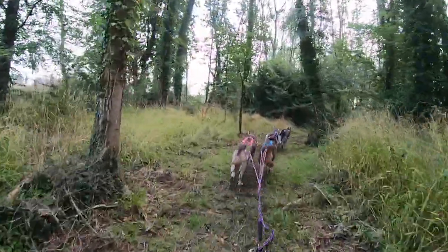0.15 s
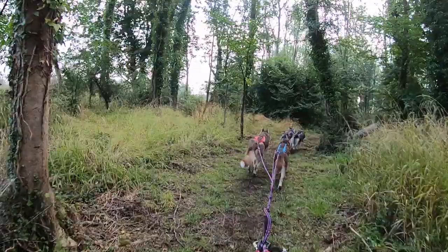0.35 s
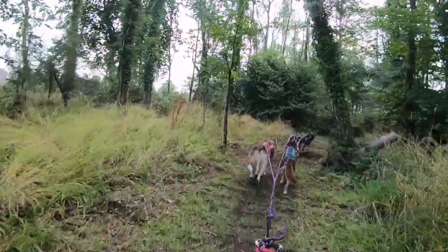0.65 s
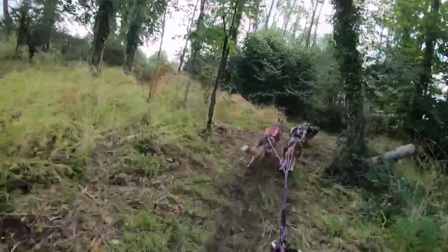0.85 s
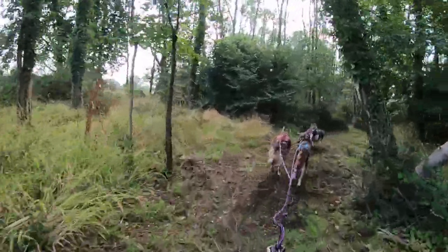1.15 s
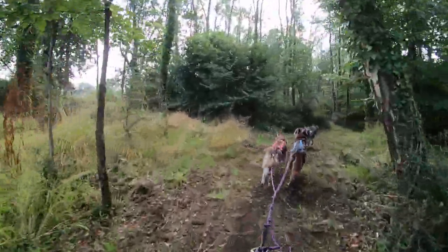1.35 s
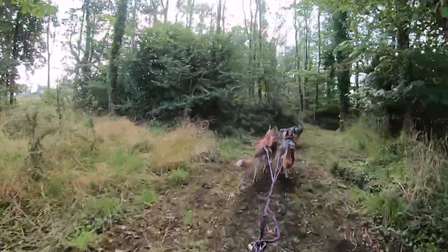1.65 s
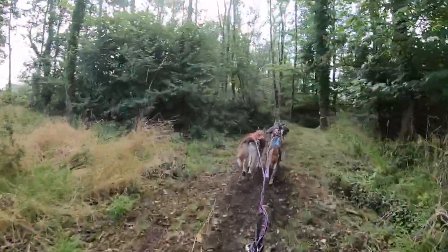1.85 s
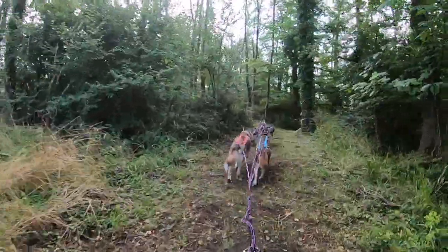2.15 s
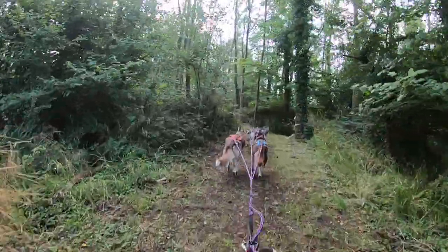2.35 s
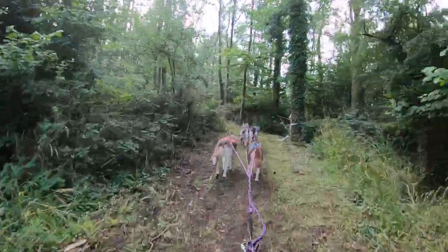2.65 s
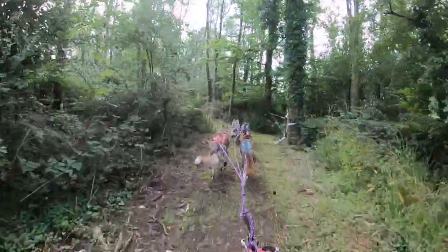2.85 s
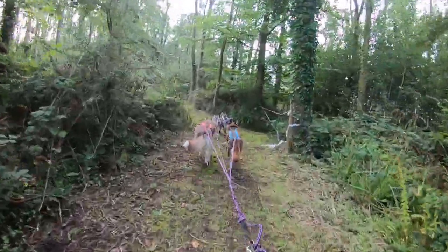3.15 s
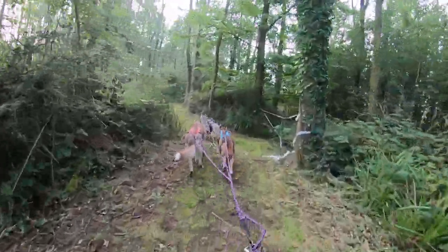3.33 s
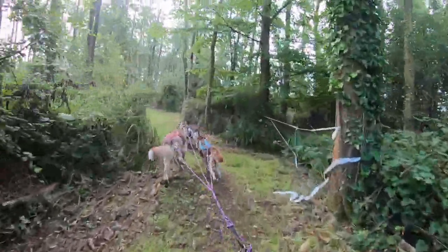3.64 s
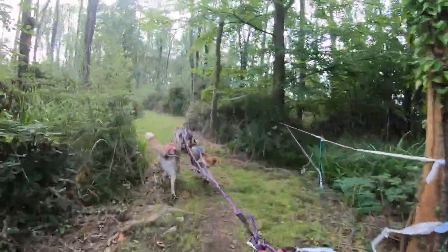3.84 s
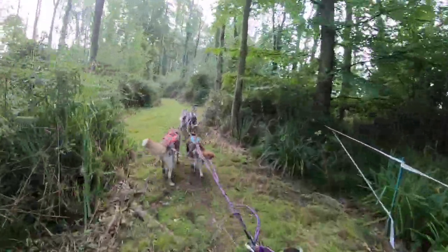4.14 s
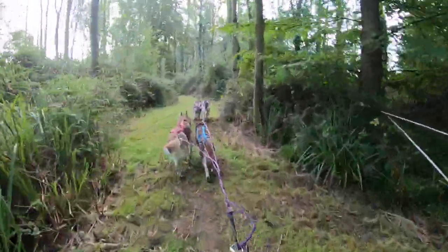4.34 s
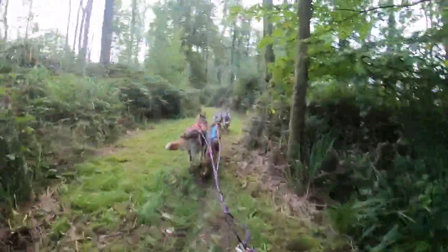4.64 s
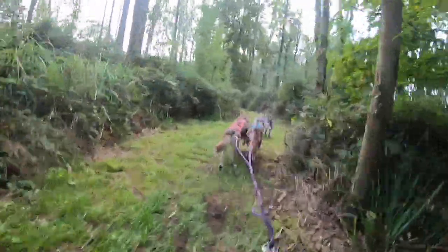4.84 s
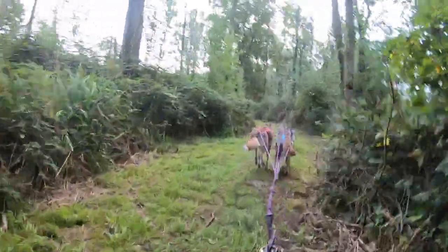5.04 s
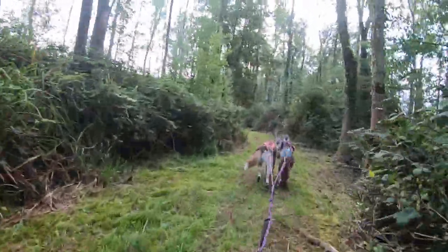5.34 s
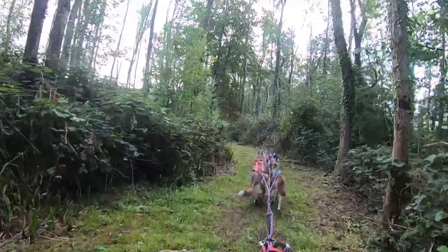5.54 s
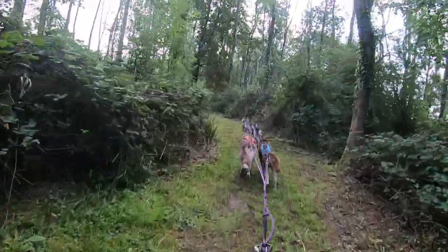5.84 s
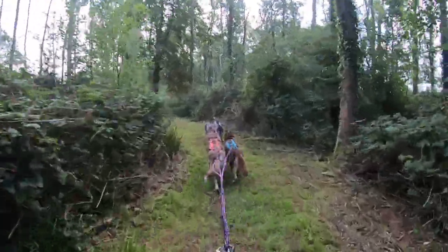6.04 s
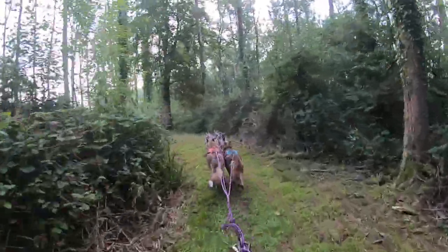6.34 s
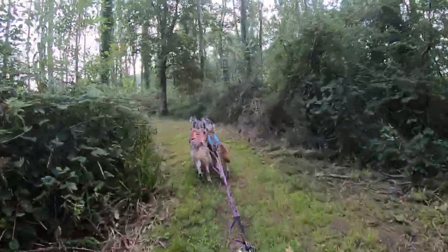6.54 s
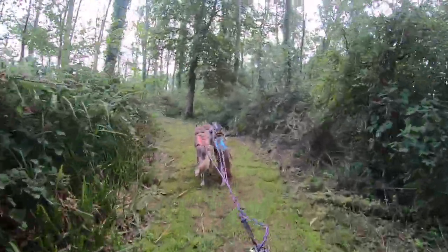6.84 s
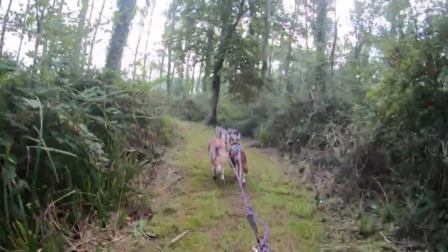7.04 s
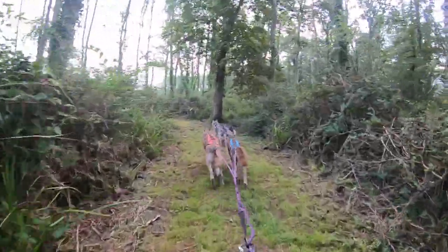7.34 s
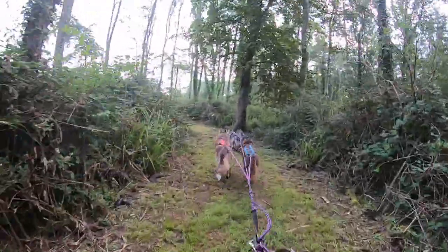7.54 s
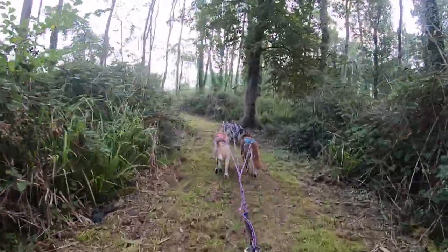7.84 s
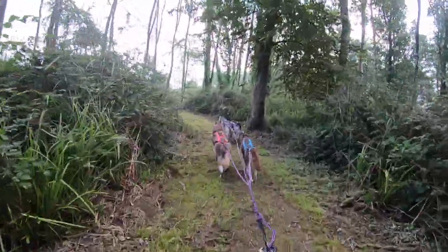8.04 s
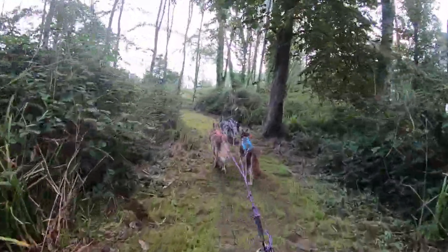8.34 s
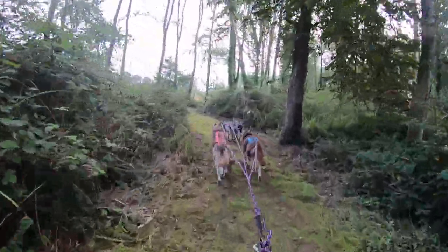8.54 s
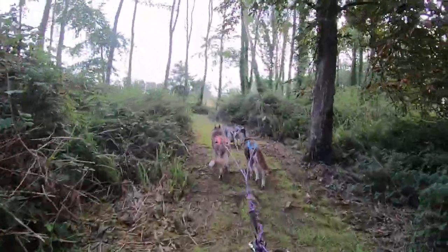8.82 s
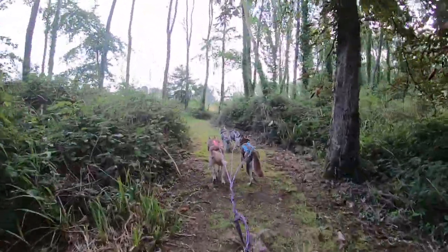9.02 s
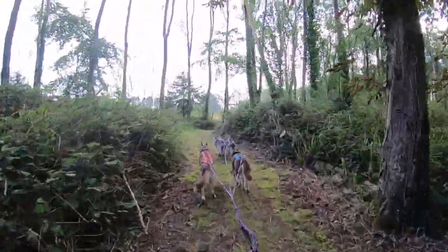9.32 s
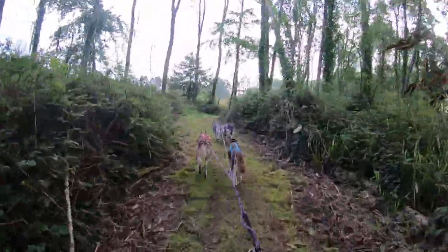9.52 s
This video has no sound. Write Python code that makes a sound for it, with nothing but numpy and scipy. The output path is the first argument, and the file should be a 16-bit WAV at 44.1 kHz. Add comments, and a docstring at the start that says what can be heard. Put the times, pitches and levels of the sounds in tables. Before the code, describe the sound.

A wheeled dog rig jolts along a dirt trail, with constant low wind rumble and frequent irregular clacks and rattles.

```python
"""Dog rig on a woodland trail

A ride on a wheeled rig behind a dog team, heard from a camera mounted on it. Wind and jolts rumble in
the microphone, tyres roll over earth and leaves, and bumps slap the loose mount against its stops.
Steel fittings clank, the frame knocks, line clips and dog tags tinkle, and something brushes a wheel."""
import sys
import numpy as np
from scipy import signal
from scipy.io import wavfile
from scipy.ndimage import uniform_filter1d

SR = 44100
rng = np.random.default_rng(int(sys.argv[2]) if len(sys.argv) > 2 else 0)


def to_wav(s):
    """Save 16-bit WAV."""
    ch = np.atleast_2d(s).T  # columns
    pcm = np.round(np.clip(ch, -1, 1) * 32767)  # PCM
    wavfile.write(sys.argv[1], SR, pcm.astype(np.int16))


N = 426888

# roots and ruts that shake the whole rig: t/s, length/s, rattle/dB, thump/dB, shudder/dB
BUMPS = [(0.03, 0.078, -35.5, -29, -34), (0.213, 0.014, -44, -14, -24), (0.311, 0.053, -25.5, -15, -21),
         (0.385, 0.029, -39, -7.5, -31), (0.759, 0.066, -47, -18.5, -28), (0.915, 0.04, -35, -16.5, -24),
         (.954, 0.023, -25.5, -14, -21), (0.999, 0.053, -21.5, -12, -18.5), (1.078, 0.011, -33, -24, -31),
         (1.214, 0.026, -62, -28, -29), (1.28, 0.045, -34.5, -16, -25.5), (1.331, 0.049, -30, -13.5, -22.5),
         (1.429, 0.014, -26, -11, -23), (1.502, 0.058, -52, -33, -50), (2.032, 0.031, -39, -20, -39),
         (2.274, 0.032, -41, -20, -40), (2.363, 0.057, -36, -15, -31.5), (2.948, 0.025, -38, -10.5, -32),
         (3.041, 0.044, -41, -13.5, -27), (3.425, 0.097, -68, -18, -32), (3.628, 0.046, -36, -17, -28),
         (3.678, 0.027, -25, -12.5, -22.5), (3.784, 0.057, -36.5, -14, -42), (3.869, 0.1, -36, -15, -30),
         (4.012, 0.051, -27.5, -17, -29.5), (4.142, 0.051, -31, -32, -45), (4.214, 0.022, -29, -27, -25),
         (4.364, 0.034, -21.5, -12, -22), (4.478, 0.1, -26, -15.5, -26.5), (4.625, 0.044, -31.5, -15, -34),
         (4.685, 0.069, -22.5, -17, -22.5), (4.799, 0.078, -23, -17, -21.5), (4.955, 0.048, -17, -20, -28),
         (5.03, 0.059, -18.5, -32, -30), (5.167, 0.089, -17, -12, -23.5), (5.271, 0.057, -27.5, -21, -36),
         (5.439, 0.078, -32.5, -23, -33), (5.758, 0.13, -36.5, -17.5, -30.5), (6.031, 0.055, -30, -17, -29),
         (6.136, 0.031, -33, -13.5, -23.5), (6.204, 0.076, -26.5, -15, -24.5), (6.36, 0.054, -55, -35, -47),
         (6.421, 0.047, -36, -35, -32), (6.558, 0.021, -28.5, -10.5, -25), (6.815, 0.043, -32, -22, -28.5),
         (6.887, 0.025, -58, -21, -25.5), (7.013, 0.083, -26.5, -14, -26.5),
         (7.107, 0.035, -16.5, -11, -18), (7.165, 0.053, -37, -12.5, -33), (7.239, 0.039, -27, -11, -25.5),
         (7.32, 0.013, -54, -18, -35), (7.537, 0.016, -36, -13, -26), (7.684, 0.088, -35, -12, -28),
         (7.992, 0.02, -44, -14.5, -29), (8.042, 0.05, -55, -31, -42), (8.143, 0.03, -25, -11, -20.5),
         (8.399, 0.013, -55, -25, -52), (8.54, 0.094, -45.5, -16.5, -45), (8.704, 0.039, -15, -11, -21),
         (8.753, 0.019, -49, -28, -37), (8.822, 0.055, -23, -13, -24.5), (9.054, 0.062, -26, -11.5, -27),
         (9.324, 0.027, -57, -19, -44), (9.443, 0.024, -24.5, -25, -23), (9.496, 0.072, -50, -21, -31),
         (9.673, .03, -16, -21, -41)]
# accent slaps of the mount against its stops: t/s, level/dB, hollow body offset/dB
HARD_SLAPS = [(0.0097, -21.5, -8), (0.0353, -29, 2), (0.068, -21, -1), (0.0767, -23, -2), (0.086, -21, -5),
              (0.0987, -19, -8), (0.3281, -16.5, -3.5), (0.3378, -18, -12), (0.353, -17.5, -4),
              (0.5717, -33, -12), (0.788, -24.5, -4), (0.888, -34.5, 1), (0.964, -16, 1.5),
              (0.9992, -8, -13), (1.0195, -7.5, -6), (1.0308, -8.5, -9), (1.077, -18, -2.5),
              (1.332, -17.5, -1.5), (1.369, -15.5, -10), (2.3, -18.5, -4.5), (2.3805, -12.5, -15),
              (3.669, -23.5, 3), (3.676, -21, 2), (3.6823, -21.5, -4), (3.697, -17, -4), (3.7071, -27, -5),
              (3.8042, -25, -10), (3.8224, -29.5, 3), (3.8855, -16.5, -5), (3.8925, -20.5, -10),
              (3.9225, -28, 7.5), (4.0141, -12, -15), (4.023, -17.5, -6), (4.0367, -15.0, -4),
              (4.1438, -27, 7.5), (4.2192, -17.5, -3), (4.3761, -11, -15), (4.384, -11, -7),
              (4.474, -16, -10), (4.4819, -18, -3.5), (4.4897, -17, -2), (4.5013, -16, -2),
              (4.5166, -15, -7), (4.5669, -15.5, -1), (4.5798, -19.5, -1), (4.6257, -15.5, -8),
              (4.6861, -15, -8), (4.705, -12, -4.5), (4.7177, -13.5, -12), (4.7289, -16, -7),
              (4.7545, -8, -7), (4.7848, -18, -1), (4.8106, -9, -9), (4.8226, -7, -7), (4.838, -8, -7),
              (4.8458, -11.5, -3), (4.8538, -18.5, 2), (4.878, -11, -14), (4.917, -17, -13),
              (4.9575, -10.5, -2), (4.9694, -10, -3), (4.9769, -15.5, 3), (4.9867, -19, -9),
              (4.9987, -7.5, -7), (5.025, -19.5, -3), (5.0347, -11.5, -2), (5.064, -9.5, -6),
              (5.0775, -13.5, -1), (5.0903, -13, -1), (5.1166, -17.5, -9), (5.1646, -10, -5),
              (5.178, -6.5, -7), (5.1898, -12.5, -2), (5.2027, -14, -1), (5.2114, -16, -13),
              (5.2188, -12, -4), (5.233, -4.5, -14), (5.2465, -12.5, -5), (5.2557, -14, -8),
              (5.2712, -12.5, -9), (5.2851, -15.5, -3), (5.3211, -13, -10), (5.3297, -17.5, -5),
              (5.3673, -24, -11), (5.394, -27, -16), (5.44, -29, -2), (5.4953, -16.5, -10),
              (5.7726, -20.5, -1), (5.7867, -22, -2), (5.8112, -23, -2), (5.8346, -22.5, -5),
              (5.8777, -18, -4.5), (6.0319, -20, -5), (6.0762, -20, -14), (6.1241, -22, -14),
              (6.1372, -13.5, -7.5), (6.1503, -17.5, -4), (6.1584, -16, -15), (6.1805, -17, -10),
              (6.2046, -8.5, -10), (6.212, -18, -7), (6.227, -10, -15), (6.2315, -15, -8),
              (6.2367, -20, -7), (6.248, -11, -17), (6.2547, -18, -14), (6.2664, -13.5, -13),
              (6.2754, -15, -19), (6.4217, -24, -8), (6.5557, -15, -3), (6.5725, -21, -2),
              (6.7287, -20.5, -12), (6.7525, -22, -12), (6.8234, -23, -5), (6.839, -24.5, 1),
              (6.903, -33, -10), (7.0203, -13.5, -7), (7.0447, -14.5, -6), (7.0613, -16.5, -3.5),
              (7.0731, -16, -2), (7.0797, -14, -7), (7.1067, -8.5, -3), (7.117, -7, -6), (7.1298, -14, 3),
              (7.1422, -7, -0.5), (7.1784, -18, -9), (7.2197, -17.5, 0.5), (7.2648, -14.5, -2),
              (7.2735, -16.5, -2), (7.3216, -22.5, -11), (7.554, -21, -3), (7.7255, -16.5, -9.5),
              (7.7362, -23, -11), (7.7567, -20, -6), (7.9911, -23.5, -10), (8.149, -15.5, -9),
              (8.1581, -12, -9), (8.1655, -17, -9), (8.1757, -13, -13), (8.3993, -24, -13),
              (8.5424, -25, -2), (8.708, -11.5, 0), (8.7199, -13.5, -2.5), (8.728, -15.5, 1.5),
              (8.7414, -12.5, -11), (8.8645, -9.5, -12.5), (8.8749, -15, -0.5), (8.8867, -18, -8),
              (9.0191, -23.5, -7), (9.0589, -10, -10), (9.0693, -14, -5), (9.0952, -18, -5),
              (9.119, -18.5, -9), (9.451, -22, 2), (9.463, -16, -3), (9.5247, -27, -19), (9.61, -25.5, -17),
              (9.6728, -14, -3)]
# modes of the mount's hollow body: f/Hz, width/Hz, level/dB
BODY_MODES = [(161, 62, -9), (267, 118, 3.5), (434, 350, -2.5), (868, 380, 2), (1116, 77, 7),
              (1240, 100, 4), (1457, 570, -0.5), (1793, 290, -1.5)]
# modes of the mount's stiff shell: f/Hz, width/Hz, level/dB
SHELL_MODES = [(1160, 910, -3.5), (2060, 1620, -3), (2606, 310, 1), (3122, 366, -2), (3317, 230, 4),
               (3582, 203, -0.5), (4210, 656, -5), (4745, 910, -7.5), (5850, 2300, -7.5),
               (6400, 2450, -12.5), (9000, 490, -26), (10400, 470, -31.5)]


def rumble(wind_db, thump):
    """The low end: wind buffets the microphone port and the heavy frame booms on every bump."""
    # spectra of the wind and of the frame's boom: f/Hz, level/dB
    wind_spectrum = [(18, -3), (30, -4), (50, 4.5), (65, 2), (85, 2.5), (120, -4.5), (160, -24.5),
                     (300, -54), (600, -81)]
    boom_spectrum = [(20, -12), (32, -1), (50, 3.5), (65, -2), (85, 5), (120, -3.5), (160, -21), (300, -42)]
    # brief dips in the rumble, swells where negative: middle t/s, length/s, depth/dB
    rumble_dips = [(.14, 0.043, 8), (.5, 0.28, 8), (.75, 0.021, 10), (1.2, 0.1, 8), (1.82, 0.061, 3),
                   (2.0, 0.027, 8), (2.6, 0.14, 7), (2.91, 0.04, 10), (3.38, 0.045, -2.5),
                   (3.6, 0.044, -3.5), (3.72, 0.037, -6), (3.755, 0.042, 9), (4.0, 0.028, 8),
                   (4.05, 0.044, -3), (4.15, 0.05, 5), (4.34, 0.047, 6), (4.55, 0.042, 3.5),
                   (5.6, 0.076, 12), (5.705, .035, 10), (5.973, 0.054, 10), (6.5, 0.038, -1),
                   (6.66, 0.049, 8), (6.94, 0.071, 4), (7.3, 0.03, 10), (7.46, 0.045, 9), (7.58, 0.028, 10),
                   (7.67, 0.024, 15), (7.93, 0.039, 7), (8.26, 0.077, 7), (8.5, 0.024, 1),
                   (9.2, 0.081, 4.5), (9.4, 0.047, 1)]
    gusting = from_db(wind_db + 2.5 + 1.64 * drift(25))
    gusts = gusting * steady(coloured(wind_spectrum, patchy_db=1), span_s=.07)
    boom = from_db(-3.5) * thump * steady(coloured(boom_spectrum, patchy_db=1.5), span_s=.027)
    return from_db(dips_db(rumble_dips)) * (gusts + boom)


def mount(times, level_db, body_db):
    """The mount slaps: its hollow body flexes first, then the shell hits the stop with a dry snap."""
    shell = strike(times, level_db, SHELL_MODES, rise_s=.0009, contact_s=.0011,
                   scatter_db=1, buzz_db=-22, buzz_s=.007, snap=.7)
    body = strike(times - .0015, level_db + body_db, BODY_MODES, rise_s=.0025, contact_s=.0016,
                  scatter_db=1.5, buzz_db=-13, buzz_s=.011, snap=.6)
    return shell + from_db(5.5) * body


def clacks():
    """Roots and ruts throw the mount hard against its stops."""
    return from_db(25) * mount(*np.transpose(HARD_SLAPS))


def rattles(swings_per_s=92, jitter=.22, decay_db_per_s=656, ceiling_db=-23, tail_s=.04):
    """Each bump sets off a run of slaps, one per swing of the mount, dying fast once it is crossed."""
    chance = np.clip(rng.standard_normal((len(BUMPS), 2, 30)), -2, 2)
    hard_times = np.array(HARD_SLAPS)[:, 0]
    slaps = []
    for (start, length, rattle_db, *_), (timing, size) in zip(BUMPS, chance):
        gaps = np.exp(jitter * timing) / swings_per_s
        t = np.cumsum(gaps) - gaps[0]
        fade_db = decay_db_per_s * np.maximum(t - length, 0)
        level_db = np.minimum(rattle_db + 2 + 2.5 * size - fade_db, ceiling_db)
        # a swing that ends in a hard slap makes no second one
        free = np.abs(start + t[:, None] - hard_times).min(axis=1) > .65 / swings_per_s
        heard = free & (t < length + tail_s) & (start + t < N / SR)
        slaps += zip(start + t[heard], level_db[heard])
    return from_db(27) * mount(*np.transpose(slaps), body_db=-2.5)


def frame_shudder(shudder_db, shake):
    """The running frame shudders in the low mids, harder on bumps."""
    # spectrum of the shaking frame: f/Hz, level/dB
    spectrum = [(100, -8.5), (170, 1.5), (250, -2), (350, -5.5), (480, -12), (700, -18), (1200, -25.5)]
    level = np.hypot(from_db(shudder_db + .5), from_db(-5) * shake)
    return level * steady(coloured(spectrum, patchy_db=5.5), span_s=.055)


def tyres(roll_db, shake):
    """Tyres roll on soft earth with a dull, lumpy noise, and the wheels hum along."""
    # modes of the rolling wheels: f/Hz, width/Hz, level/dB
    wheel_modes = [(508, 57, 3), (1140, 146, -4.5), (1485, 146, -6), (1840, 130, -9.5)]
    # spectrum of tyres on earth: f/Hz, level/dB
    spectrum = [(150, -4), (330, 6.5), (520, 2.5), (700, -3), (900, -5.5), (1120, -16), (1400, -17.5),
                (1900, -24), (2600, -28)]
    tread = rng.standard_normal(N) * from_db(4.6 * drift(30))
    hum = rms_one(sum(from_db(db) * resonate(tread, hz, width_hz) for hz, width_hz, db in wheel_modes))
    lumps = rms_one(from_db(2 * drift(36)))
    level = np.hypot(from_db(roll_db - 1), from_db(-8.5) * shake)
    return level * lumps * soften(coloured(spectrum, patchy_db=2.5) + from_db(-5) * hum, top_hz=2270)


def knocks(split_hz=950):
    """A blow on the frame thuds in its low modes and rings briefly in its high ones."""
    # blows on the frame: t/s, ring/dB, thud/dB, extra treble/dB
    blows = [(.451, -41.5, -28, 0), (0.907, -31, -15, -14), (1.607, -37, -25, -2), (1.619, -46, -20.5, -2),
             (1.908, -39, -24.5, -2), (2.029, -30.5, -15.5, -4), (2.109, -27.5, -37, -16),
             (2.216, -36, -23, -18), (2.341, -42, -20, -4), (2.355, -48, -35, -7), (2.496, -41, -24.5, -6),
             (2.824, -34, -22, -15), (2.939, -34.5, -22, -7), (2.953, -43, -27, 0), (3.054, -37, -33, -4),
             (3.231, -45, -21.5, -3), (3.417, -30, -27, -4), (5.59, -29, -39, 5), (5.606, -35.5, -25, -10),
             (5.915, -45, -49, -6), (6.719, -35, -37, -2), (6.752, -22, -37, -4.5), (7.861, -26.5, -28, -7),
             (7.87, -34, -30, 1), (8.141, -26, -21, -2), (9.290, -46, -26, -12), (9.350, -32.5, -43, -12)]
    # modes of the frame: f/Hz, width/Hz, level/dB
    frame_modes = [(330, 86, -6), (543, 94, 4), (910, 346, -5.5), (1124, 100, 8), (1530, 170, -2.5),
                   (1950, 215, 4.5), (2630, 280, 2.5), (3360, 430, -4), (6800, 400, -23)]
    times, ring_db, thud_db, treble_db = np.transpose(blows)
    low = [mode for mode in frame_modes if mode[0] < split_hz]
    high = [mode for mode in frame_modes if mode[0] >= split_hz]
    thud = strike(times, thud_db, low, rise_s=.001, contact_s=.0012,
                  scatter_db=1, buzz_db=-24, buzz_s=.008)
    ring = strike(times, ring_db, high, rise_s=.0028, contact_s=.0025,
                  scatter_db=2, buzz_db=-20, buzz_s=.014, treble_db=treble_db)
    return from_db(36.5) * (soften(thud, top_hz=1500) + ring)


def clanks():
    """A steel fitting snaps against the frame, bounces and rings."""
    # hits and rebounds of the fitting: t/s, level/dB, extra treble/dB
    hits = [(1.054, -20.5, 5.5), (1.0572, -24, 3), (1.065, -30, 7), (1.447, -22, 2), (1.4556, -32, 7),
            (1.459, -41, -5), (1.507, -31, -8), (2.397, -25, 3), (2.403, -24, -1), (2.409, -38, -2),
            (3.415, -20.5, -0.5), (3.421, -29, 0), (3.428, -37, 0)]
    # ringing modes of the steel over a broad clash: f/Hz, width/Hz, level/dB
    steel_modes = [(1508, 160, -2), (1990, 210, 2), (2840, 120, 1.5), (3500, 92, -2), (4070, 120, 1.5),
                   (4600, 1140, -6), (5025, 24, 7), (5280, 18, -1), (5400, 120, 3), (5540, 65, -3),
                   (6050, 390, 2.5), (6120, 130, -4), (7300, 380, -17), (8000, 85, -2), (8650, 130, -12),
                   (8900, 1800, -18)]
    times, level_db, treble_db = np.transpose(hits)
    return from_db(33.5) * strike(times, level_db, steel_modes, rise_s=.003, contact_s=.003,
                                  scatter_db=1.5, buzz_db=-15, buzz_s=.02, treble_db=treble_db)


def line_clips(jingles_per_s=5):
    """Clips on the swinging tow line touch: clear ticks among faint random jingles."""
    # clear touches of the clips: t/s, level/dB
    ticks = [(0.41, -47), (.828, -49), (1.153, -36), (1.201, -44), (1.35, -37), (2.039, -37.5),
             (2.108, -34.5), (2.502, -47), (2.567, -43), (2.844, -47), (2.950, -46), (3.84, -40),
             (3.930, -44), (5.001, -28.5), (7.413, -40), (7.75, -41), (8.361, -44), (8.422, -50),
             (9.256, -41), (9.492, -45)]
    # modes of a clip: f/Hz, width/Hz, level/dB
    clip_modes = [(8600, 260, 7), (9700, 370, -3.5), (10700, 600, -14)]
    timing, size = rng.random((150, 2)).T
    times = np.cumsum(-np.log(timing)) / jingles_per_s
    level_db = -53 + 5.5 * (2 * size - 1)
    heard = times < N / SR
    touches = ticks + list(zip(times[heard], level_db[heard]))
    return from_db(29.5) * strike(*np.transpose(touches), clip_modes, rise_s=.005, contact_s=.003,
                                  scatter_db=2, buzz_db=-14, buzz_s=.014)


def dog_tags():
    """Metal tags on the dogs touch with a thin tinkle."""
    # touches of the tags: t/s, level/dB
    touches = [(5.647, -49), (6.655, -49), (6.792, -50), (7.965, -46), (8.255, -43.5), (8.271, -49),
               (9.491, -39), (9.504, -41)]
    # modes of a tag: f/Hz, width/Hz, level/dB
    tag_modes = [(5620, 190, 1), (6550, 140, -4), (6700, 150, -7), (9500, 230, -18)]
    return from_db(43) * strike(*np.transpose(touches), tag_modes, rise_s=.003, contact_s=.003,
                                scatter_db=2, buzz_db=-16, buzz_s=.012)


def mount_chatter(litter_db, bounces_per_s=80, spread_db=10):
    """The mount keeps bouncing lightly at uneven intervals, louder on rough ground."""
    times = np.cumsum(rng.gamma(3, 1 / 3, size=2200)) / bounces_per_s
    size_db = spread_db * np.clip(rng.standard_normal(len(times)), -2, 2)
    heard = times < N / SR
    bounces = steady(mount(times[heard], size_db[heard], body_db=-5), span_s=.035)
    return from_db(litter_db - 2) * bounces


def mount_buzz(litter_db, rattle):
    """Fine trembling keeps the mount's narrow midrange modes ringing between the slaps."""
    tremble = rng.standard_normal(N) * from_db(3 * drift(90))
    modes = [(hz, width_hz, db) for hz, width_hz, db in BODY_MODES + SHELL_MODES
             if 800 < hz < 4500 and width_hz < hz / 6]
    ring = sum((-1) ** k * from_db(db) * resonate(tremble, hz, width_hz)
               for k, (hz, width_hz, db) in enumerate(modes))
    return np.hypot(from_db(litter_db - 9), from_db(-10.5) * rattle) * rms_one(ring)


def leaf_litter(litter_db, rattle):
    """Dry leaves crush under the tyres in tiny grains, louder on bumps."""
    # spectrum of the crunch: f/Hz, level/dB
    spectrum = [(1000, 2), (2000, 11.5), (3400, -5.5), (4500, -13.5), (6000, -12.5), (7800, -8),
                (9000, -17), (10500, -21), (12000, -32)]
    grains = rms_one(from_db(2.2 * drift(220)))
    level = np.hypot(from_db(litter_db - 10.5), from_db(-17) * rattle)
    return level * grains * coloured(spectrum, patchy_db=4)


def wheel_rub():
    """Something slides on a turning wheel with a short, even hiss."""
    # envelope of the rub: t/s, level/dB
    envelope = [(2.40, -90), (2.44, -65), (2.51, -47), (2.63, -48.5), (2.8, -49.5), (2.86, -62),
                (2.92, -90)]
    # spectrum of the rub: f/Hz, level/dB
    spectrum = [(1500, 12), (1900, 4), (2600, 4.5), (4000, -1), (5500, 3), (8200, -9), (10500, -15)]
    level_db, = in_time(envelope)
    t = np.arange(N) / SR
    touching = (t > envelope[0][0]) & (t < envelope[-1][0])
    return touching * from_db(level_db) * coloured(spectrum, patchy_db=.8)


def grass(lull_db):
    """Grass under the tyres lays down a faint, uneven hiss."""
    # spectrum of the hiss: f/Hz, level/dB
    spectrum = [(1500, 2.5), (2400, 7), (3400, 3), (5000, -0.5), (8200, -10.5), (10500, -13)]
    return from_db(-55 + lull_db / 2 + 1.5 * drift(20)) * coloured(spectrum, patchy_db=1.5)


def through_cover(x):
    """The microphone's cover colours the treble of airborne sound."""
    # two dips and a peak of the cover: f/Hz, width/Hz, gain/dB
    cover_bands = [(6950, 270, -1), (7800, 1200, 6.5), (9900, 600, -11)]
    for hz, width_hz, db in cover_bands:
        x = x + (from_db(db) - 1) * resonate(x, hz, width_hz)
    return x


def strike(times, level_db, modes, rise_s, contact_s, scatter_db, buzz_db, buzz_s, treble_db=0, snap=0):
    """Each blow is a short gritty contact with a fading buzz, driving each mode at its own strength."""
    t = np.arange(SR // 14) / SR
    attack = (1 - np.exp(-(t / rise_s) ** 2)) ** 2
    contact = np.exp(-np.maximum(t - rise_s, 0) / contact_s)
    shape = attack * (contact + from_db(buzz_db) * np.exp(-t / buzz_s))
    starts = np.round((np.asarray(times) - rise_s / 2) * SR).astype(int)
    at = np.clip(starts, 0, N - 1)[:, None] + np.arange(len(t))
    grit = rng.standard_normal(at.shape) * shape
    grit[:, int(rise_s * SR)] += snap * np.linalg.norm(shape)  # the clean click of a hard contact
    grit *= from_db(level_db)[:, None] / np.linalg.norm(grit, axis=1, keepdims=True)
    strengths = from_db(scatter_db * rng.standard_normal((len(at), len(modes))))
    is_treble = np.array(modes)[:, 0] > 2300
    strengths *= from_db(np.outer(treble_db, is_treble))
    ring = 0
    for k, (hz, width_hz, mode_db) in enumerate(modes):
        force = np.bincount(at.ravel(), (grit * strengths[:, k:k + 1]).ravel(), minlength=N)[:N]
        ring = ring + (-1) ** k * from_db(mode_db) * resonate(force, hz, width_hz)
    return ring


def bump_envelope(level_db, rise_s=.019, settle_s=.0082):
    """Gain over time: each bump builds, holds while the wheels cross it and settles in the frame."""
    t, power = np.arange(0, N, 20) / SR, 1e-12
    for (start, length, *_), db in zip(BUMPS, level_db):
        attack = np.clip(1 + (t - start) / rise_s, 0, 1)
        release = np.exp(-np.maximum(t - start - length, 0) / settle_s)
        power = power + (from_db(db) * attack * release) ** 2
    return np.interp(np.arange(N) / SR, t, np.sqrt(power))


def dips_db(rows):
    """Bell-shaped dips in level, as dB over time."""
    t = np.arange(0, N, 20) / SR
    depth_db = sum(db * np.exp(-(2 * (t - middle) / length) ** 2) for middle, length, db in rows)
    return -np.interp(np.arange(N) / SR, t, depth_db)


def coloured(spectrum, patchy_db):
    """Third-octave bands of noise, each flickering on its own; rms 1."""
    hz, level_db = np.transpose(spectrum)
    centres = 16 * 2 ** (np.arange(30) / 3)
    white, noise = rng.standard_normal((2, N + SR // 2)), 0
    for k, centre in enumerate(centres):
        if hz[0] <= centre <= hz[-1]:
            sos = signal.butter(2, centre * 2 ** (np.array([-1, 1]) / 6), "band", fs=SR, output="sos")
            band_db = np.interp(np.log(centre), np.log(hz), level_db) + patchy_db * drift(23.4)
            noise = noise + from_db(band_db) * signal.sosfilt(sos, white[k % 2])[-N:]
    return rms_one(noise)


def drift(rate_hz, hop=40):
    """A smooth random wobble with a spread of 1."""
    r = np.exp(-2 * hop * np.pi * rate_hz / SR)
    slow = signal.lfilter([1], [1, -2 * r, r * r], rng.standard_normal(N // hop + 2002))[2000:]
    return np.interp(np.arange(N) / hop, np.arange(len(slow)), rms_one(slow))


def steady(x, span_s):
    """Level the power to about 1 over every stretch of span_s."""
    size = max(int(span_s * SR), 1)
    power = uniform_filter1d(uniform_filter1d(x ** 2, size), size)
    return x / np.sqrt(np.abs(power) + 1e-4 * np.mean(x ** 2))


def resonate(x, hz, width_hz):
    """One resonance with gain 1 at its peak."""
    r = np.exp(-np.pi * width_hz / SR)
    feedback = [1, -2 * r * np.cos(2 * np.pi * hz / SR), r * r]
    floor = 1e-18 * (-1) ** (np.arange(N) // 2)  # keeps the tails from underflowing
    return signal.lfilter(np.array([1, 0, -1]) * (1 - r * r) / 2, feedback, x + floor)


def soften(x, top_hz, order=3):
    """Roll off the treble above top_hz."""
    return signal.sosfilt(signal.butter(order, top_hz, fs=SR, output="sos"), x)


def in_time(rows):
    """One per-sample curve for each column after the times."""
    times, *columns = np.transpose(rows)
    return [np.interp(np.arange(N) / SR, times, column) for column in columns]


def from_db(db):
    """Decibels to gain."""
    return 10 ** (np.asarray(db) / 20)


def rms_one(x):
    """Scale to unit power."""
    return x / np.sqrt(np.mean(x ** 2) + 1e-20)


def scene():
    """Everything travels with the rig, close to one microphone, in open air."""
    # the running bed under the bumps: t/s, wind/dB, frame shudder/dB, tyre roll/dB, leaf litter/dB
    bed_levels = [(0, -18, -42, -36, -60), (.58, -23, -34, -43, -56), (1.14, -19.5, -35.5, -45, -37),
                  (1.8, -27, -40, -39, -55), (2.2, -20.5, -35, -38, -43), (2.65, -24.5, -39, -39, -50),
                  (3.3, -26, -37.5, -41, -51), (3.75, -22.5, -38.5, -37, -45),
                  (4.3, -20.5, -39, -39, -40.5), (5.0, -17.5, -27, -37, -35),
                  (5.38, -22, -33, -39.5, -37.5), (5.65, -20.5, -35, -43.5, -42),
                  (6.35, -21.5, -33, -48, -41), (6.7, -20, -48, -38, -40.5), (7.42, -21.5, -41, -40, -44.5),
                  (8.3, -23, -37.5, -40.5, -46), (8.65, -20, -33.5, -38, -41),
                  (9.2, -21.5, -34.5, -38, -46), (9.68, -19, -42, -42, -39)]
    # brief lulls in the ground noise, swells where negative: middle t/s, length/s, depth/dB
    ground_lulls = [(0.6, 0.18, 3), (1.21, 0.057, 7), (1.8, 0.24, 2.5), (3.755, 0.057, 5.5),
                    (4.32, 0.046, -2.5), (5.6, 0.12, 3), (5.702, 0.046, -2.5), (5.973, 0.033, 13),
                    (6.66, 0.052, 3), (6.955, 0.09, 6.5), (7.42, 0.12, 2), (7.595, 0.052, 8),
                    (7.807, 0.03, 14), (7.929, 0.039, 3), (8.04, 0.064, 15), (8.23, 0.036, 9),
                    (8.942, 0.067, 5), (9.201, 0.13, 4)]
    wind_db, *ground_db = in_time(bed_levels)
    lull_db = dips_db(ground_lulls)
    shudder_db, roll_db, litter_db = np.array(ground_db) + lull_db
    rattle, thump, shake = (bump_envelope(level_db) for level_db in np.transpose(BUMPS)[2:])
    low_end = rumble(wind_db, thump)
    rolling = frame_shudder(shudder_db, shake) + tyres(roll_db, shake) + leaf_litter(litter_db, rattle)
    hiss = through_cover(wheel_rub() + grass(lull_db))
    hits = clacks() + knocks() + clanks() + line_clips() + dog_tags()
    clatter = rattles() + mount_chatter(litter_db) + mount_buzz(litter_db, rattle)
    return (low_end + rolling + hiss + hits + clatter)[None, :]


def record(dry, cutoff_hz=15300):
    """The covered microphone leaks only a little of the top octave; peaks are rounded, the top is cut."""
    dull = soften(dry, top_hz=10780, order=12)
    leak = from_db(-9.5) * resonate(dry, hz=13400, width_hz=900)
    rounded = .85 * np.tanh((dull + leak) / .85)
    return signal.sosfilt(signal.ellip(10, .5, 70, cutoff_hz, fs=SR, output="sos"), rounded)


dry = scene()
out = record(dry)
to_wav(out)
```